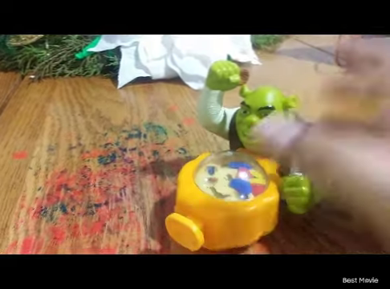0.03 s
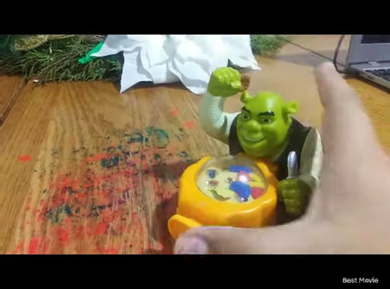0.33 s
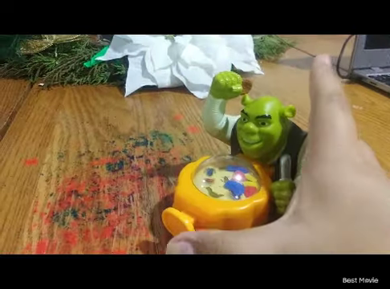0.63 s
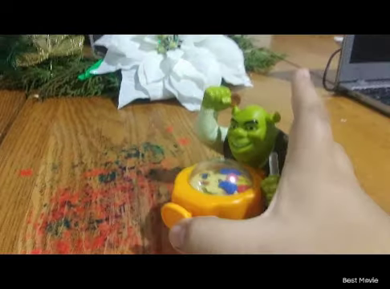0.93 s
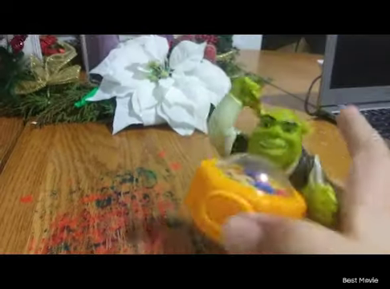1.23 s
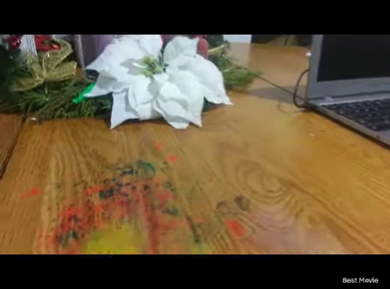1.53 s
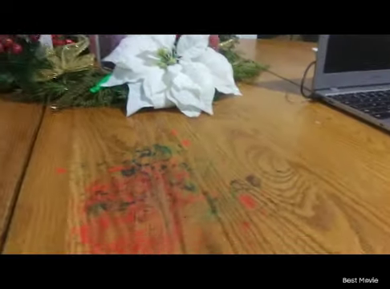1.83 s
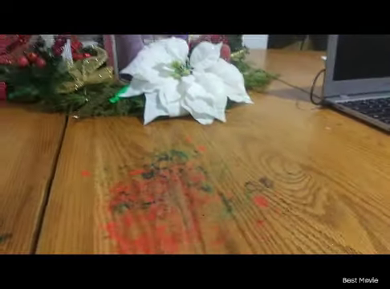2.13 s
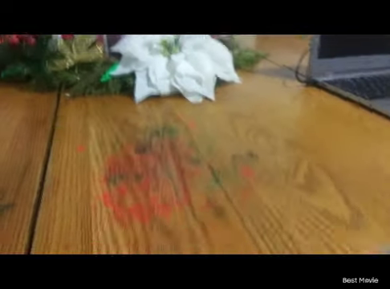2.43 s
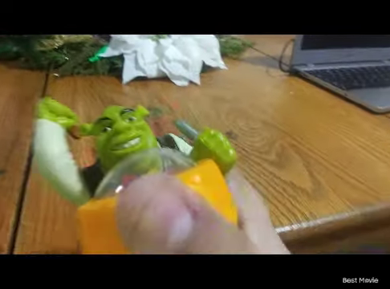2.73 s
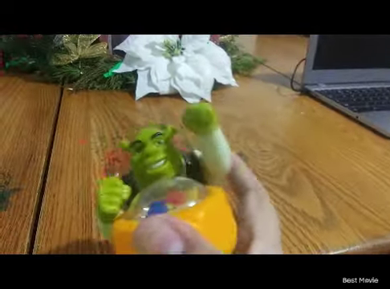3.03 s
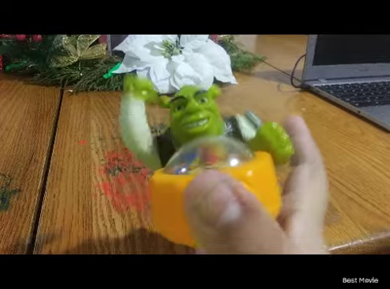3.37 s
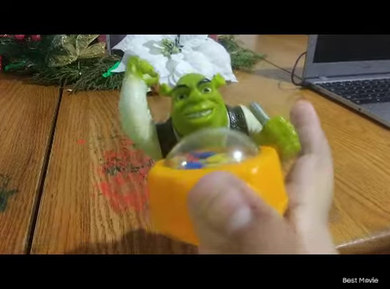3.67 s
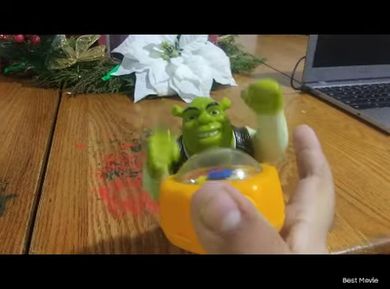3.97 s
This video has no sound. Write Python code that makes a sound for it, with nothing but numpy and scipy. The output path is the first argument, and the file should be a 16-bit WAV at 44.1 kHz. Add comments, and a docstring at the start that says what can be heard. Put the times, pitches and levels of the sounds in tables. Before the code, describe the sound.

A hollow plastic toy is handled softly, then shaken hard, its loose arms clacking.

```python
"""A hollow plastic toy is shaken hard: its loose arms clack against their stops, chatter and tick.
Each hit makes the shell ring briefly, and a small room answers with an echo.
Before the shaking, a hand picks the toy off a table with soft clicks and rubs.
A low hum lies underneath, and a limiter squeezes the loudest peaks."""
import sys
import numpy as np
from scipy import signal
from scipy.io import wavfile
from scipy.ndimage import uniform_filter1d, minimum_filter1d

SR = 44100
rng = np.random.default_rng(int(sys.argv[2]) if len(sys.argv) > 2 else 0)


def output_pcm(signal):
    """Save a mono or channel-first signal as 16-bit PCM at the path in sys.argv[1].

    Samples are clipped to [-1, 1] before scaling.
    """
    pcm = np.clip(np.atleast_2d(signal).T, -1, 1) * 32767
    wavfile.write(sys.argv[1], SR, np.round(pcm).astype(np.int16))


N = 4 * SR

# Spots where the shell is struck ("full", "hollow", "high"): knock_db, echo_db
SPOTS = {"full": (-4.5, 1), "hollow": (-8.5, -7.5), "high": (-2, 0)}


def shaking():
    """Arms clack on their stops and chatter as they settle. Gives the direct sound and the room's share."""
    # An arm hits its stop: start_s, spot, ring_db, crack_db, snap_db, tick_db, chatter_db
    clacks = [(2.9102, "full", -2, -8.5, -11.5, -18.5, -23), (3.036, "full", -2, -6, -8, -14.5, -16.5),
              (3.0576, "high", -9.5, -10, -9.5, -35, -51), (3.2673, "hollow", 5, -3, -1.5, -4.5, -12.5),
              (3.303, "high", -7.5, -9, -10, -16, -37), (3.3234, "full", -23, -20.5, -21, -38, -41),
              (3.344, "hollow", -17.5, -34, -36, -42, -56), (3.445, "full", 0, -8.5, -8.5, -16, -22),
              (3.518, "full", -3.5, -12, -10.5, -10, -19), (3.540, "full", -8.5, -13.5, -11.5, -13, -39),
              (3.6796, "hollow", 1, -7.5, -8, -16, -14.5), (3.715, "high", -5.5, -6.5, -8, -12, -28),
              (3.9027, "full", -0.5, -8, -10, -13, -16.5), (3.9293, "high", -10.5, -16, -12.5, -16.5, -47)]
    chatter_delay_s = .0055
    chatter_boost_db = [1.5, 1.5, 2.3, 6.7]  # ring, crack, snap, tick
    direct, to_room = np.zeros((2, N))
    for start_s, spot, *parts_db, chatter_db in clacks:
        knock_db, echo_db = SPOTS[spot]
        clack = amp(parts_db) @ contact(knock_db, spot)
        bounces = scrape(contact(knock_db, spot), length_s=.0055, hits_per_s=1300, spread_db=3.5)
        chatter = amp(chatter_db) * amp(chatter_boost_db) @ np.array([burst(part) for part in bounces])
        for at_s, sound in (start_s, clack), (start_s + chatter_delay_s, chatter):
            add(direct, at_s, sound)
            add(to_room, at_s, amp(echo_db) * sound)
    return direct, to_room


def contact(knock_db=0, spot="full"):
    """One hit on plastic in four parts, low to high: ring (with a dull knock), crack, snap and tick."""
    # The tone of each noisy part of a hit: pitch_hz, level_db
    knock_tone = [(40, -32), (150, -26), (350, -7.5), (520, -0.5), (750, -2.5), (1200, 7), (1900, 9),
                  (4000, -19.5)]
    crack_tone = [(1500, -23.5), (2400, -3.5), (3000, -4.5), (3550, 3), (4200, 4), (4750, -1.5),
                  (7500, -44.5)]
    snap_tone = [(3800, -27.5), (5200, -4), (5900, 0), (7200, 5.5), (8000, 1.5), (10500, -15.5)]
    tick_tone = [(6500, -32.5), (8400, -7.5), (9550, -5.5), (11400, -13.5), (16000, -14.5)]
    knock = strike(knock_tone, fade_s=.027)
    crack = strike(crack_tone, fade_s=.037)
    snap = strike(snap_tone, fade_s=.028)
    tick = strike(tick_tone, fade_s=.022)
    ring = burst(shell_ring(spot) + amp(knock_db) * knock)
    return np.array([ring, crack, snap, tick])


def strike(tone, fade_s):
    """A sharp first pulse, then a scatter of noise that fades by 60 dB in fade_s."""
    t = np.arange(3000) / SR
    pulse = 4.7 * (t == 0)
    scatter = rng.standard_normal(len(t)) * amp(-60 * t / fade_s)
    return burst(colour(pulse + scatter, tone))


def shell_ring(spot):
    """The hollow shell rings at several pitches; the spot struck sets how strong each one is."""
    # The shell's own notes, with a level for each spot: pitch_hz, full_db, hollow_db, high_db
    notes = [(934, -14.5, -20, -29), (1057, -7, -6.5, -22), (1082, -3.5, -10.5, -22), (1298, -6.5, -22, -8),
             (1501, -9, -3.5, -24), (1598, -6.5, 0, -10.5), (1643.5, -2, -1, -5.5), (1694, -12.5, -29, 2),
             (2084, -17, -14.5, 2.5)]
    fade_s, spread_db, detune = .024, 1.8, .008
    t = np.arange(3000) / SR
    ring = np.zeros(len(t))
    for k, (pitch_hz, *spot_db) in enumerate(notes):
        level_db = spot_db[list(SPOTS).index(spot)] + spread_db * rng.standard_normal()
        hz = pitch_hz * (1 + detune * rng.standard_normal())
        ring += (-1) ** k * amp(level_db - 60 * t / fade_s) * np.cos(2 * np.pi * hz * t)
    band = signal.butter(2, [830, 1830], "bandpass", fs=SR, output="sos")
    return burst(signal.sosfilt(band, ring))


def rattling():
    """Small loose parts tick, hardly ringing the shell; the smallest jiggle at random."""
    # Ticks between the clacks: start_s, crack_db, tick_db
    rattles = [(2.9263, -51, -25), (2.96, -52, -26.5), (2.975, -34, -24.5), (3.0176, -44, -27.5),
               (3.022, -54, -29), (3.1713, -51, -27), (3.245, -34, -39), (3.251, -24, -31),
               (3.428, -28, -36), (3.565, -26, -26), (3.665, -29, -28), (3.7998, -25, -25.5),
               (3.945, -36, -34), (3.958, -28, -31)]
    # The thin tone of the loose parts: pitch_hz, level_db
    rattle_tone = [(7000, -6), (9800, -2), (12500, -14), (15000, -12)]
    ring_db, jiggles_per_s = -24, 70
    ticks = np.zeros(N)
    for start_s, crack_db, tick_db in rattles:
        snap_db = (crack_db + tick_db) / 2
        add(ticks, start_s, amp([ring_db, crack_db, snap_db, tick_db]) @ contact())
    t = np.arange(N) / SR
    hits = (rng.random(N) < jiggles_per_s / SR) * (t > 2.92)  # only during the shaking
    strength = amp(-42.5 + 2 * np.minimum(rng.exponential(1, N), 2))
    jiggle = signal.fftconvolve(hits * strength, contact()[-1])[:N]  # the tick part alone
    return colour(ticks + jiggle, rattle_tone)


def handling():
    """Fingers grip and turn the toy: soft clicks and rubs, duller than the clacks."""
    # The toy's joints click and ring: start_s, pitch_hz, ring_db, snap_db
    joints = [(1.624, 3630, -47, -63), (1.639, 3860, -44, -53), (1.66, 4000, -35, -41.5),
              (1.6698, 4080, -37.5, -38), (1.731, 4160, -41.5, -54), (1.834, 4560, -41.5, -55.5),
              (2.0785, 3860, -44.5, -66), (2.121, 4030, -48.5, -72), (2.866, 3640, -47, -42.5)]
    # Fingers tap the toy; the row at 2.369 s is the toy rebounding just after the knock before it: start_s,
    # ring_db, crack_db, snap_db
    taps = [(0.575, -54.5, -72, -80), (.727, -51.5, -56, -57), (0.7685, -54, -57, -61),
            (.965, -53.5, -61, -69), (1.044, -48.5, -57, -65), (1.236, -47.5, -63, -62),
            (1.366, -57, -57, -65), (2.174, -44, -54, -75), (2.2258, -42, -49, -71),
            (2.3539, -31, -34.5, -43), (2.369, -42, -46, -44.5)]
    # Skin rubs on plastic: start_s, length_s, ring_db, crack_db, snap_db
    strokes = [(0.427, 0.082, -56, -64, -70), (0.721, 0.043, -50, -59, -81),
               (1.334, 0.15, -61.5, -62, -66.5), (1.792, 0.1, -55, -46, -64.5),
               (1.958, 0.14, -51.5, -44, -61), (2.14, 0.053, -50.5, -47.5, -74),
               (2.222, 0.059, -47, -38, -55.5)]
    # The tone of rubbing, and of all the handling: pitch_hz, level_db
    rub_tone = [(1000, 2.5), (2450, -1.5), (3500, 0), (4300, -14), (5600, -6), (7200, -2), (10000, 3.5)]
    finger_tone = [(200, 4), (2000, 0), (4100, 0.5), (5000, -4), (6300, -1.5), (7100, 0.5), (13000, -11)]
    knock_db, tick_offset_db = 14, -9.5
    clicks, rubs = np.zeros((2, N))
    for start_s, pitch_hz, ring_db, _ in joints:
        add(clicks, start_s, amp(ring_db) * joint_ring(pitch_hz, fade_s=.015))
    # Each joint also gives a weaker shell ring and crack.
    joint_clicks = [(start_s, db - 16, db - 4, snap_db) for start_s, _, db, snap_db in joints]
    for start_s, ring_db, crack_db, snap_db in taps + joint_clicks:
        gains = amp([ring_db, crack_db, snap_db, snap_db + tick_offset_db])
        add(clicks, start_s, gains @ contact(knock_db))
    for start_s, length_s, ring_db, crack_db, snap_db in strokes:
        parts = scrape(contact(knock_db), length_s, hits_per_s=700, spread_db=3)
        parts = parts / parts[:, :int(length_s * SR)].std(1, keepdims=True)
        gains = amp([ring_db, crack_db, snap_db, snap_db + tick_offset_db])
        add(rubs, start_s, gains @ parts)
    return colour(clicks + colour(rubs, rub_tone), finger_tone)


def joint_ring(pitch_hz, fade_s):
    """A small joint rings at one pitch and dies away."""
    t = np.arange(0, fade_s, 1 / SR)
    return burst(amp(-60 * t / fade_s) * np.sin(2 * np.pi * pitch_hz * t))


def scrape(parts, length_s, hits_per_s, spread_db):
    """A run of tiny hits swells and fades, each one repeating the four parts of a contact."""
    longest = SR // 4
    strength = amp(spread_db * np.minimum(rng.exponential(1, longest), 4))
    sign = rng.choice([-1, 1], longest)
    hits = rng.random(longest) < hits_per_s / SR
    hits[0] = True
    run = (strength * sign * hits)[:int(length_s * SR)]
    swell = np.sin(np.pi * np.linspace(.1, .9, len(run)))
    return signal.fftconvolve(parts, (run * swell)[None], axes=1)


def room(sound):
    """The pattern of echoes changes as the toy moves: three echo tails take turns."""
    cycle_s, echo_db = .35, -10.5
    turns = np.arange(N) / SR / cycle_s
    shares = np.maximum(np.cos(2 * np.pi * (turns - np.arange(3)[:, None] / 3)), 0)
    shares = shares / np.linalg.norm(shares, axis=0)
    return amp(echo_db) * sum(signal.fftconvolve(sound * share, echo_tail())[:N] for share in shares)


def echo_tail():
    """Many reflections blur into one tail; the highest treble dies first."""
    # How long the echo takes to fall by 60 dB: pitch_hz, fade_s
    fade_times = [(250, 0.42), (1700, 0.38), (4500, 0.51), (8000, 0.43), (14000, 0.33)]
    # The tone of the room: pitch_hz, level_db
    room_tone = [(150, -2), (600, -2.5), (1500, 1), (4000, -4.5), (7000, -8), (15000, -11)]
    echoes_per_s, delay_s, build_s = 6000, .006, .012
    t = np.arange(SR * 3 // 4) / SR
    reflections = rng.choice([-1., 1.], len(t)) * (rng.random(len(t)) < echoes_per_s / SR)
    hz, age_s, spectrum = signal.stft(reflections, SR, nperseg=256)
    fade = amp(-60 * age_s / read(fade_times, hz)[:, None])
    echo = signal.istft(spectrum * fade, SR, nperseg=256)[1][:len(t)]
    echo *= np.clip((t - delay_s) / build_s, 0, 1)
    return colour(echo / np.linalg.norm(echo), room_tone) / amp(read(room_tone, 1400))


def background():
    """The wavering hum of an appliance over quiet room air."""
    # The notes of the hum: pitch_hz, level_db
    hum_notes = [(59.5, -72), (184, -67), (240, -50.5), (468, -65.5)]
    # The tone of the air: pitch_hz, level_db
    air_tone = [(25, -48), (48, -29), (82, -25), (175, -15), (270, -15), (480, -16.5), (695, -28),
                (1370, -30), (2990, -32.5), (5430, -45), (16000, -54)]
    t = np.arange(N) / SR
    hum = np.zeros(N)
    for pitch_hz, level_db in hum_notes:
        peak = np.sqrt(2) * amp(level_db + .8 * drift())
        hum += peak * np.sin(2 * np.pi * pitch_hz * t + .15 * drift())
    air = unit(colour(rng.standard_normal(N), air_tone))
    return hum + amp(-52.5) * air


def drift():
    """A slow random wander."""
    t = np.arange(N) / SR
    rates_hz = np.geomspace(.5, 10, 12)
    return unit(sum(np.sin(2 * np.pi * (hz * t + rng.random())) / np.sqrt(hz) for hz in rates_hz))


def amp(db):
    """Turns decibels into a gain."""
    return 10 ** (np.asarray(db) / 20)


def unit(sound):
    """Scales a sound to an average level (rms) of 1."""
    return sound / np.sqrt(np.mean(sound ** 2) + 1e-20)


def burst(sound):
    """Scales a short sound to the energy of 10 ms at level 1."""
    return sound * np.sqrt(.01 * SR / (np.sum(sound ** 2) + 1e-20))


def read(table, hz):
    """Looks up a pitch in a table, sliding between its rows."""
    pitches_hz, values = np.transpose(table)
    return np.interp(np.log(hz + 1), np.log(pitches_hz), values)


def add(mix, start_s, sound):
    """Mixes a sound in at start_s."""
    part = mix[round(start_s * SR):][:len(sound)]
    part += sound[:len(part)]


def colour(sound, tone):
    """Filters a sound to the given tone, with no ringing ahead of a hit."""
    hz = abs(np.fft.fftfreq(4096, 1 / SR))
    log_gain = np.log(amp(read(tone, hz)))
    response = np.fft.ifft(np.exp(np.conj(signal.hilbert(log_gain)))).real
    return signal.fftconvolve(sound, response[:len(response) // 2])[:len(sound)]


def scene():
    """The toy, its echo in the room and the background, in one channel."""
    clacks, clacks_to_room = shaking()
    rattle, fingers = rattling(), handling()
    echo = room(clacks_to_room + rattle + amp(3) * fingers)  # more echo while held further away
    return (clacks + rattle + fingers + echo + background())[None]


def record(dry):
    """A fast limiter turns peaks down, a soft ceiling rounds them, and the top treble is cut."""
    limit_db, recover_db_per_s, ceiling, cutoff_hz = -.5, 711, .88, 15850
    over_db = np.maximum(20 * np.log10(abs(dry[0]) + 1e-9) - limit_db, 0)
    recovery_db = np.arange(N) * recover_db_per_s / SR
    cut_db = np.maximum.accumulate(over_db + recovery_db) - recovery_db
    limited = dry * amp(uniform_filter1d(minimum_filter1d(-cut_db, size=13), size=13))
    rounded = limited / (1 + (limited / ceiling) ** 6) ** (1 / 6)
    treble_cut = signal.firwin(601, cutoff_hz, window=("kaiser", 8), fs=SR)
    return signal.oaconvolve(rounded, treble_cut[None], "same")


dry = scene()
out = record(dry)
output_pcm(out)
```